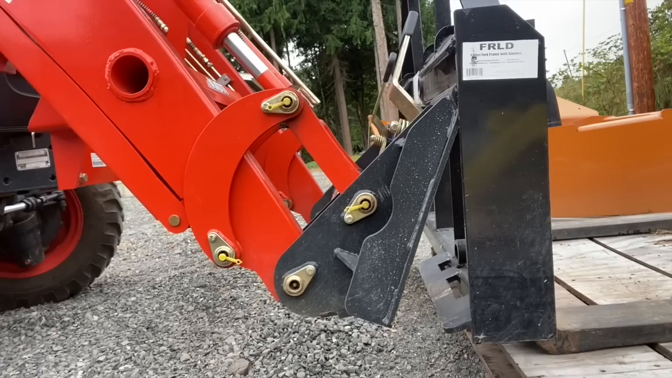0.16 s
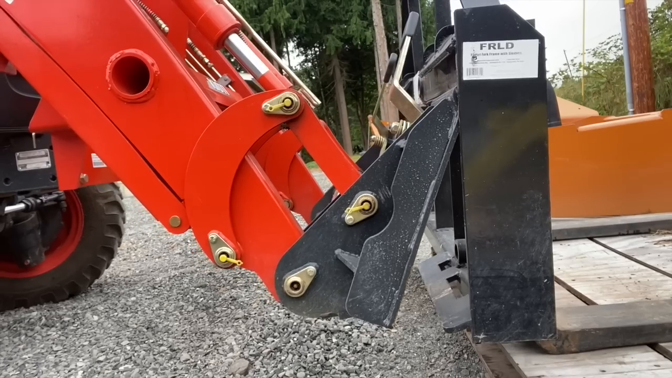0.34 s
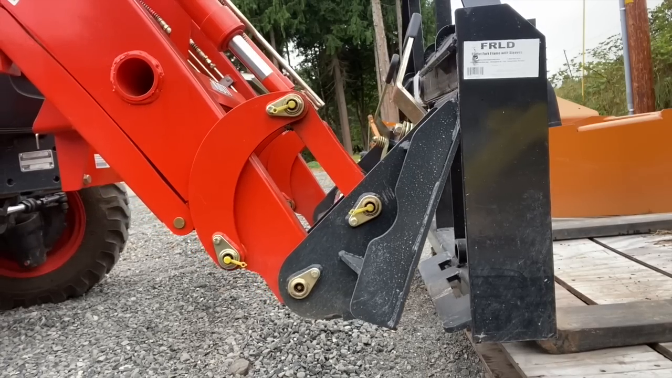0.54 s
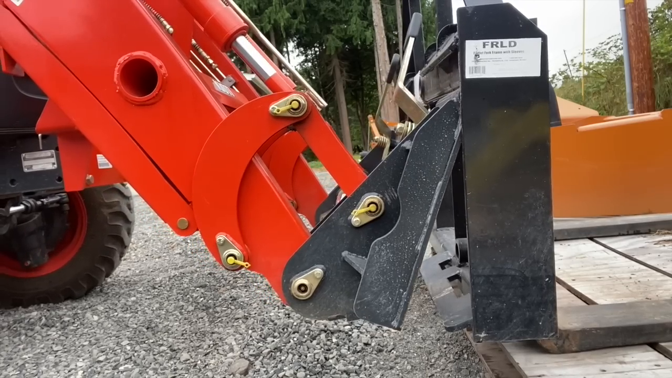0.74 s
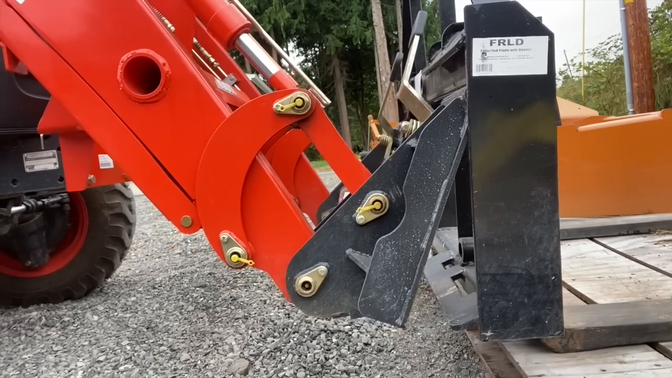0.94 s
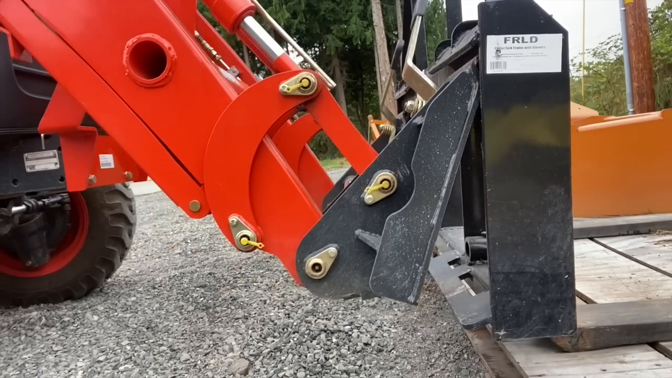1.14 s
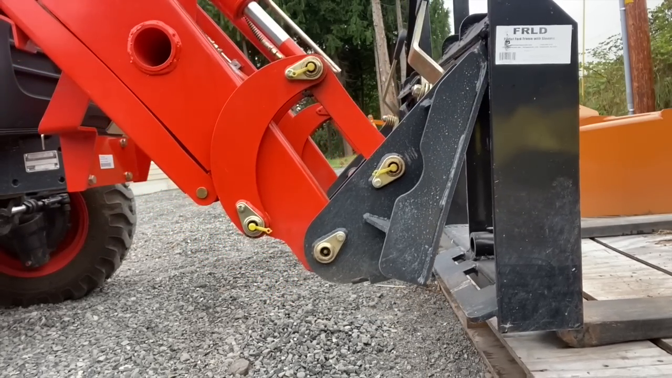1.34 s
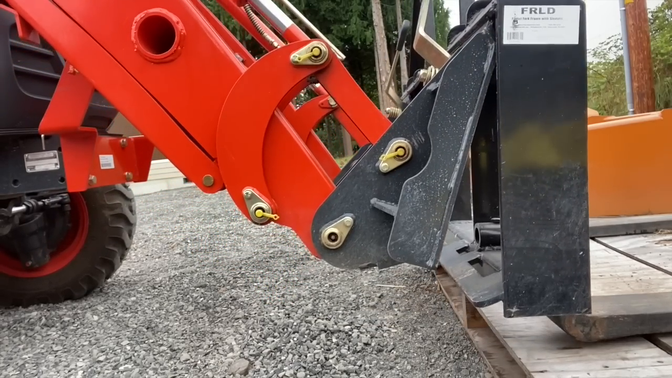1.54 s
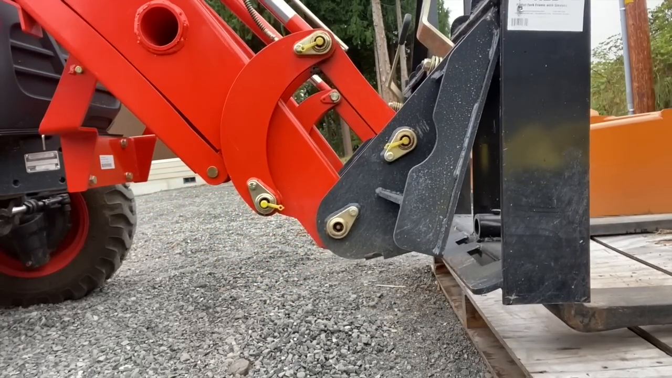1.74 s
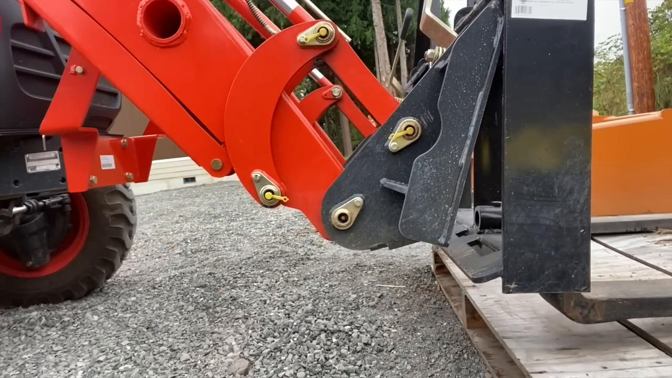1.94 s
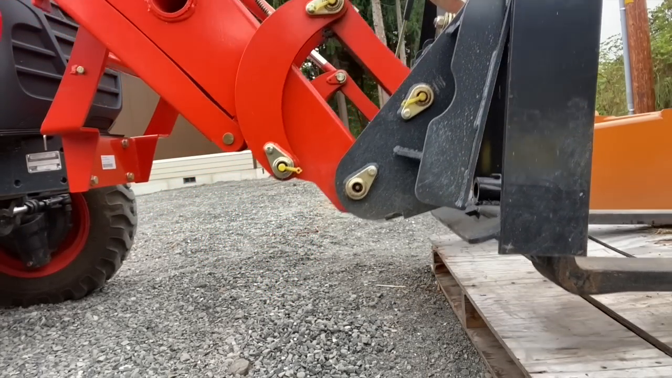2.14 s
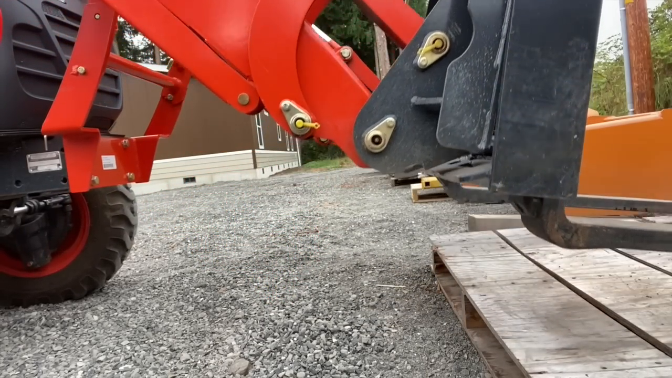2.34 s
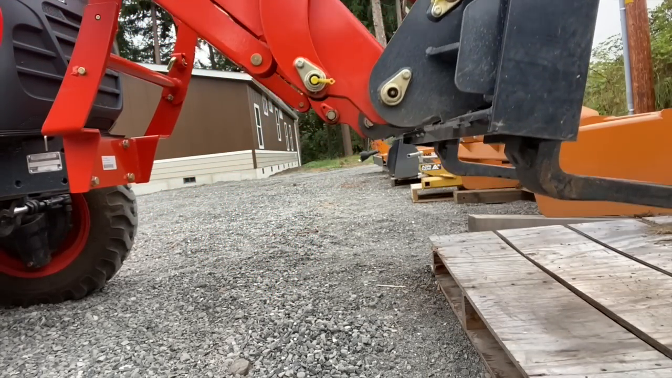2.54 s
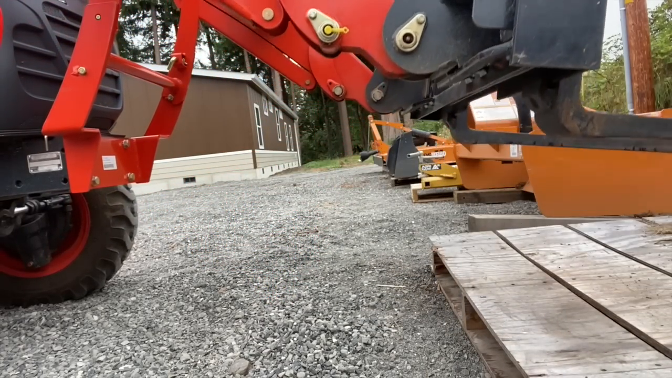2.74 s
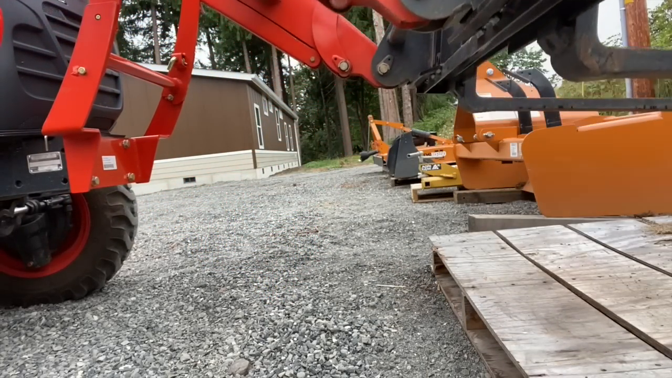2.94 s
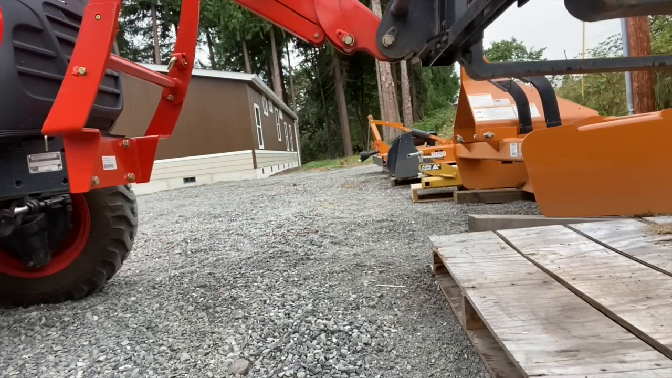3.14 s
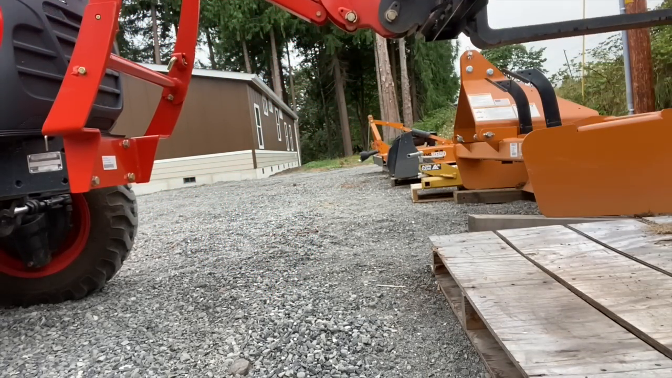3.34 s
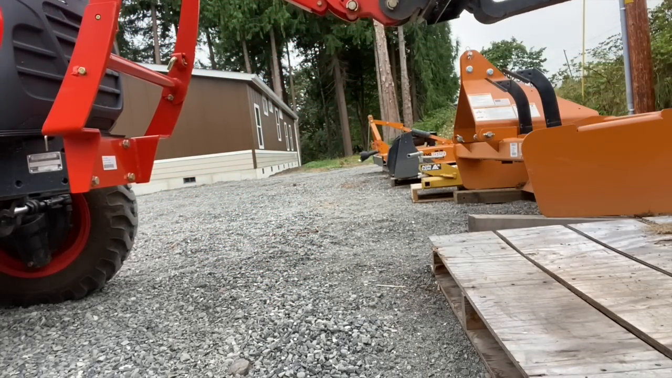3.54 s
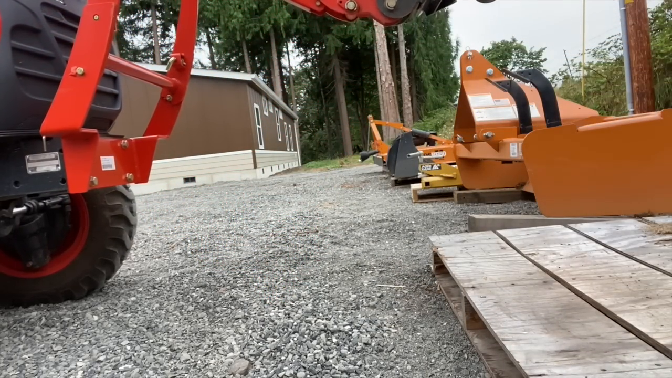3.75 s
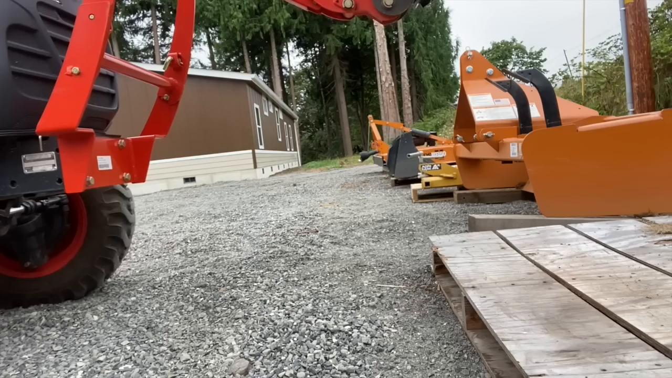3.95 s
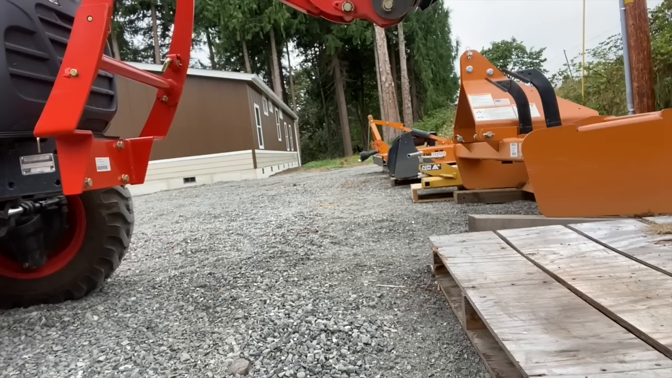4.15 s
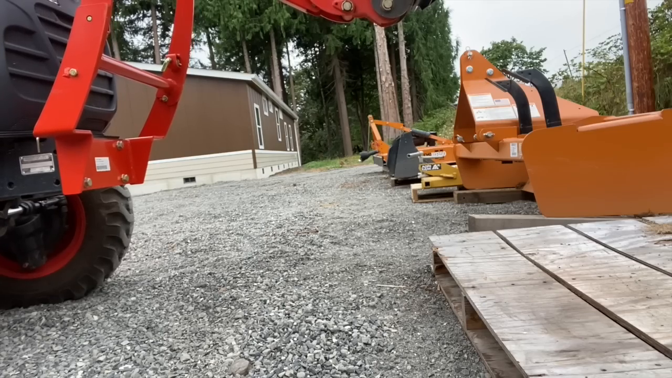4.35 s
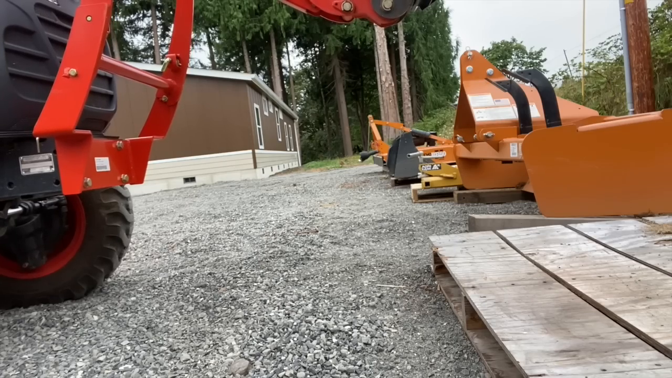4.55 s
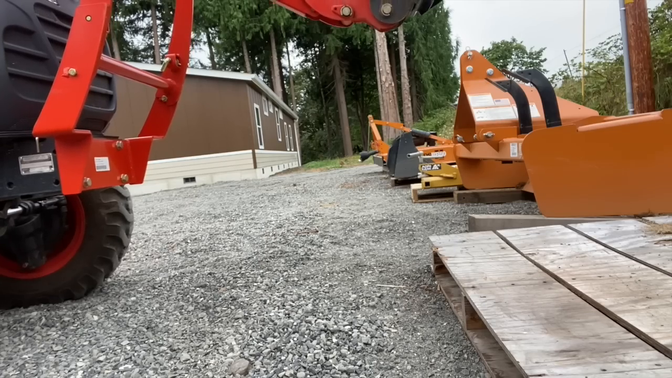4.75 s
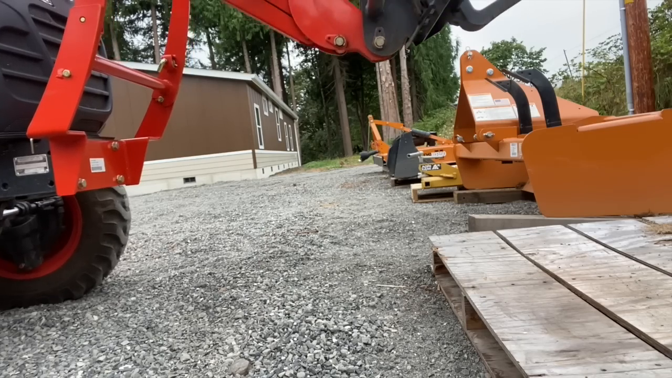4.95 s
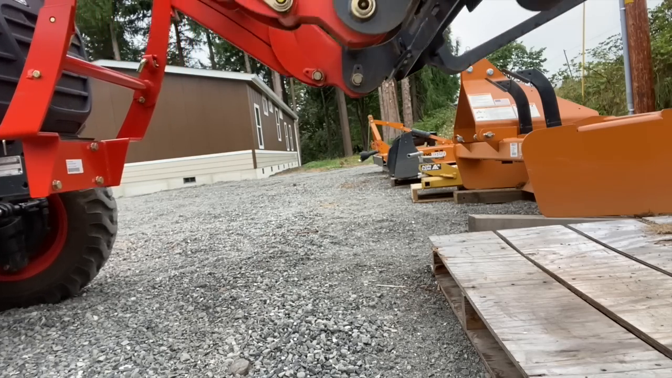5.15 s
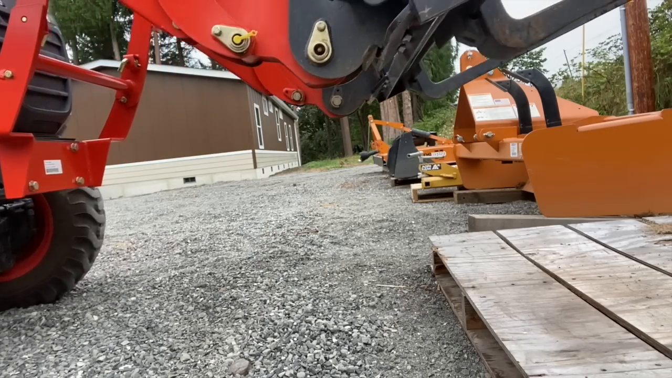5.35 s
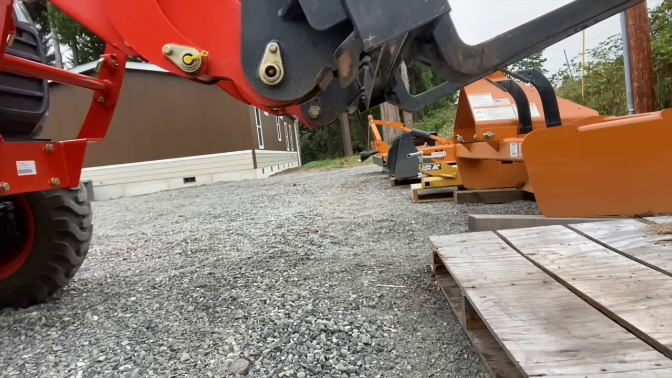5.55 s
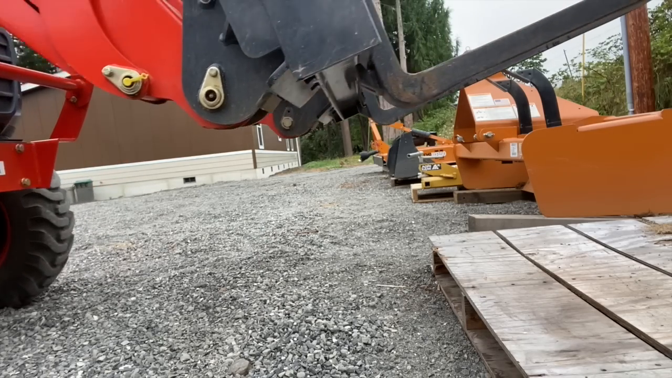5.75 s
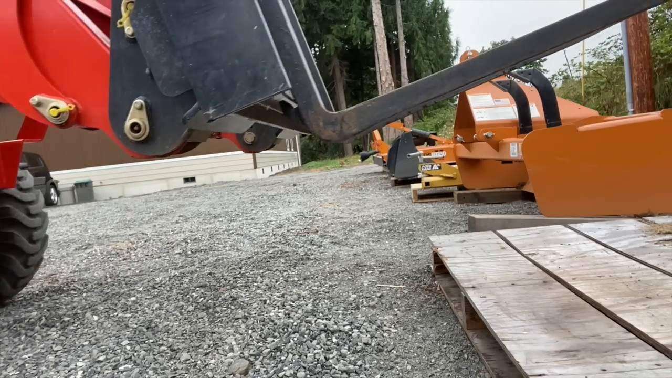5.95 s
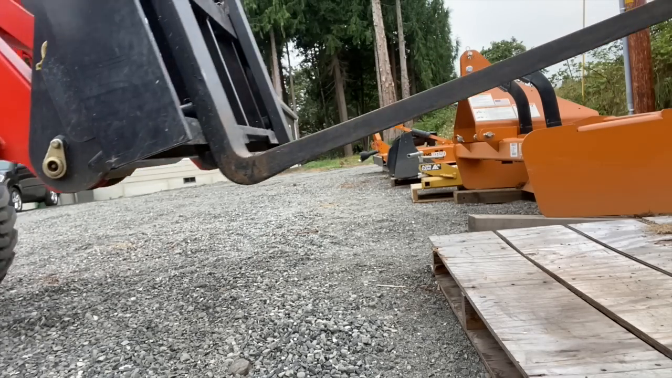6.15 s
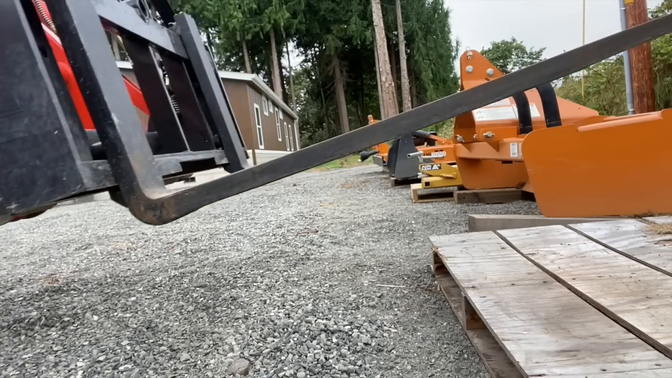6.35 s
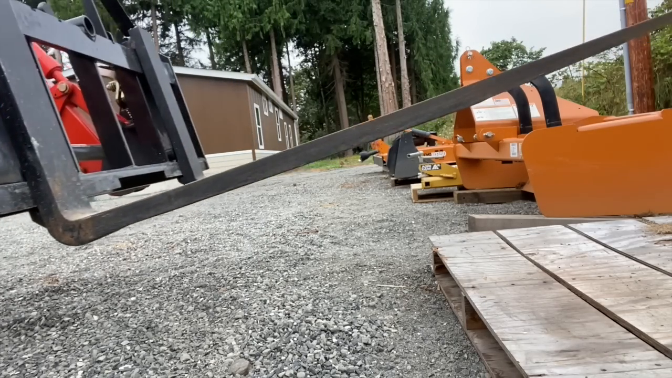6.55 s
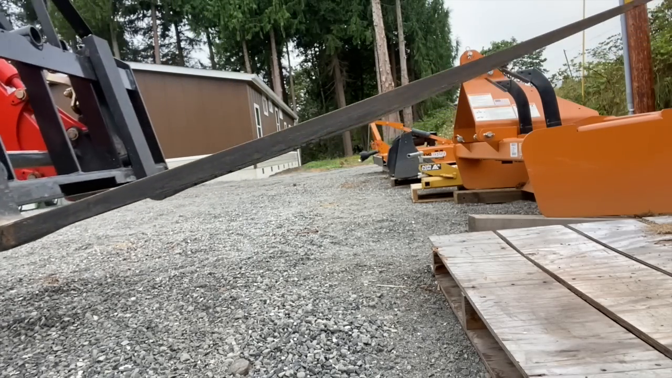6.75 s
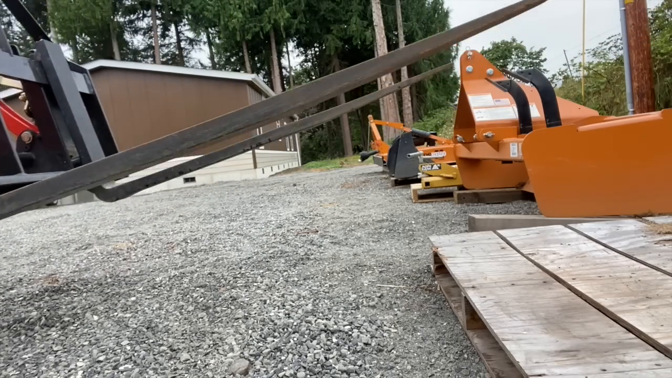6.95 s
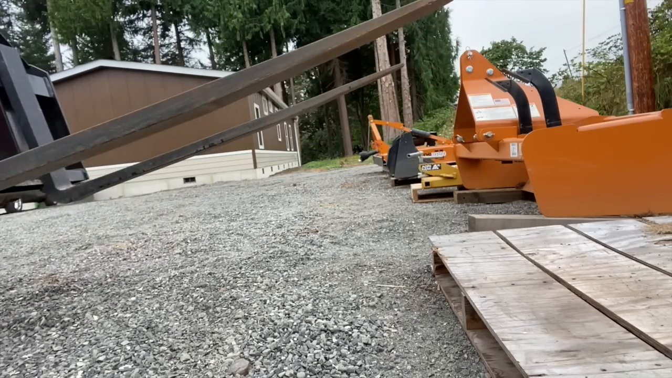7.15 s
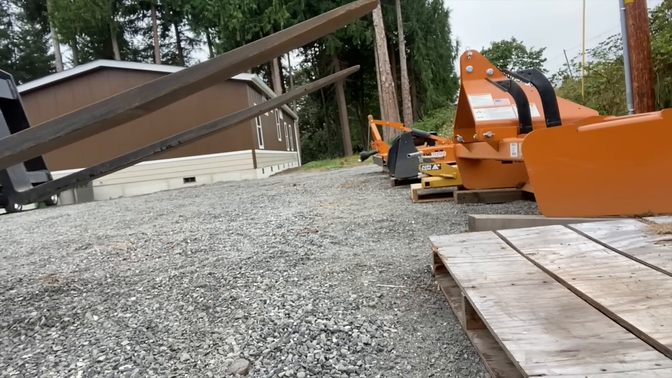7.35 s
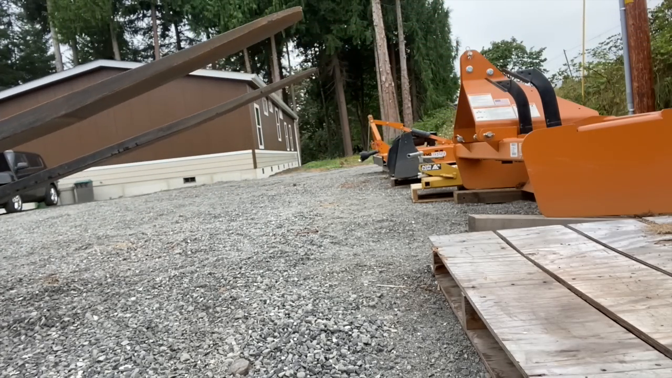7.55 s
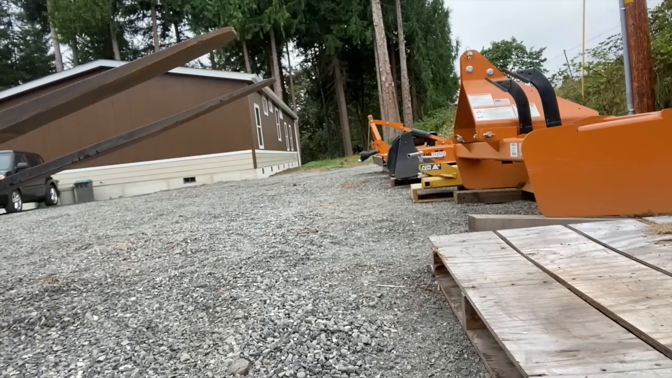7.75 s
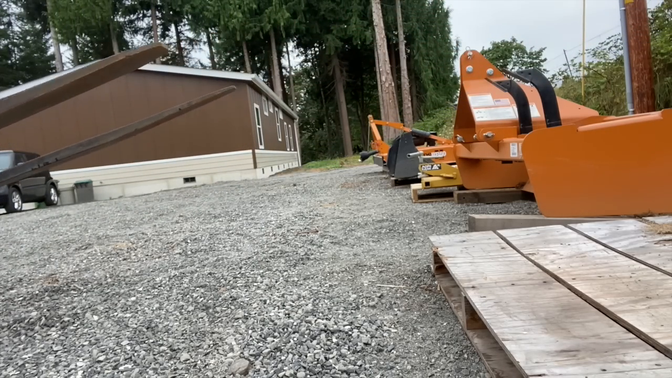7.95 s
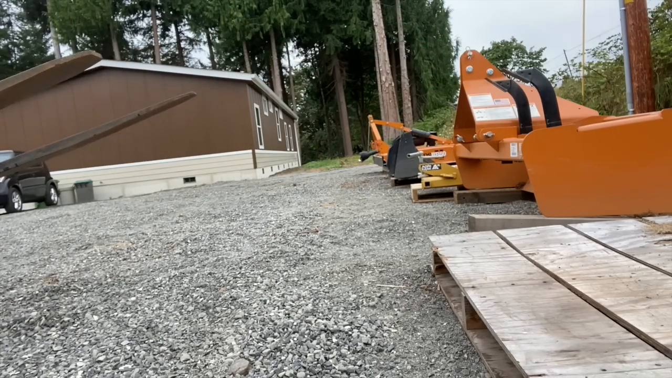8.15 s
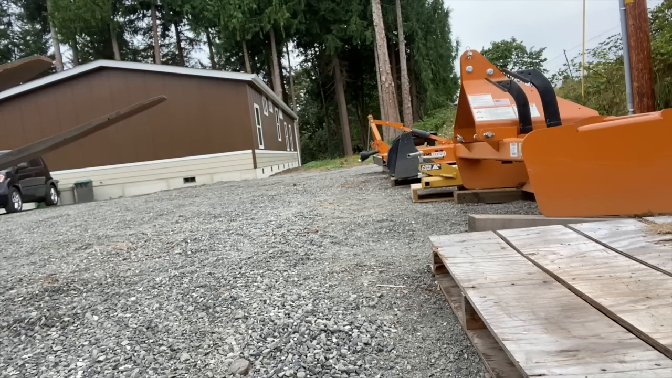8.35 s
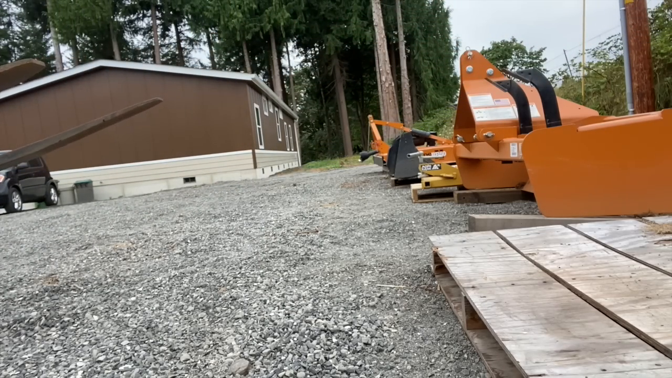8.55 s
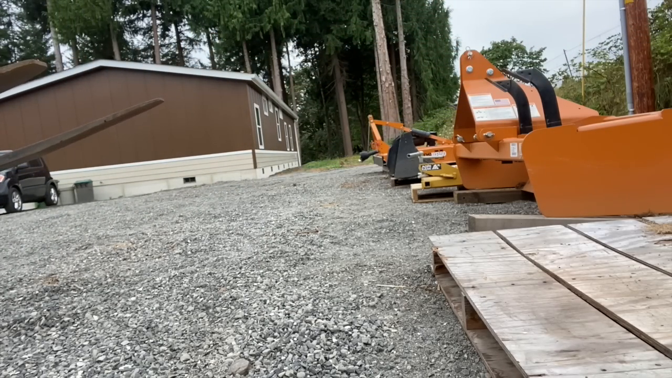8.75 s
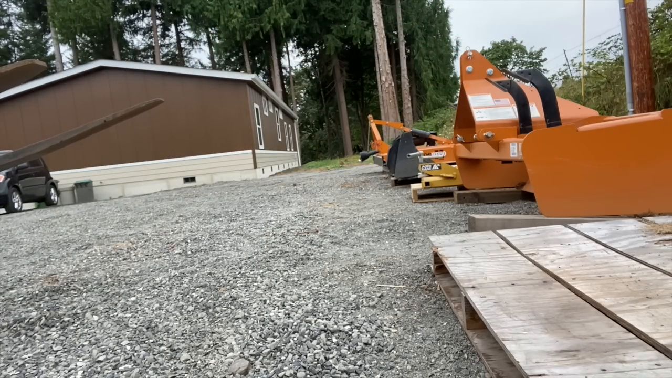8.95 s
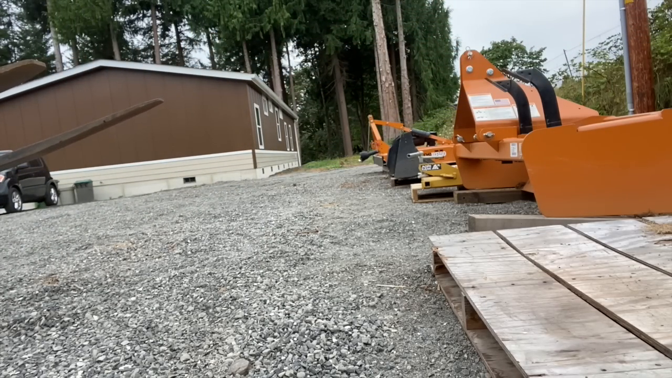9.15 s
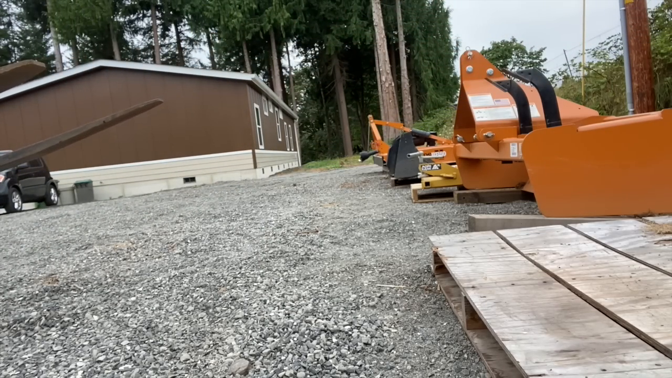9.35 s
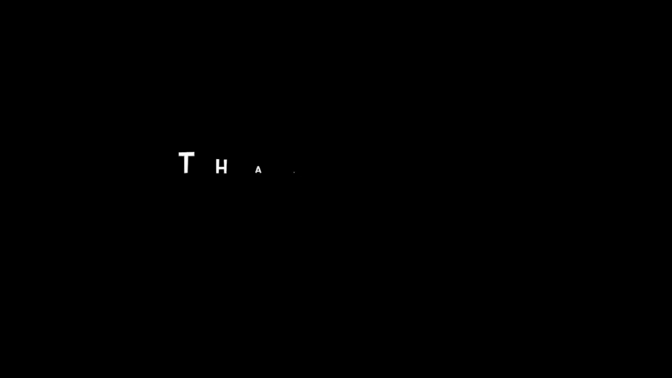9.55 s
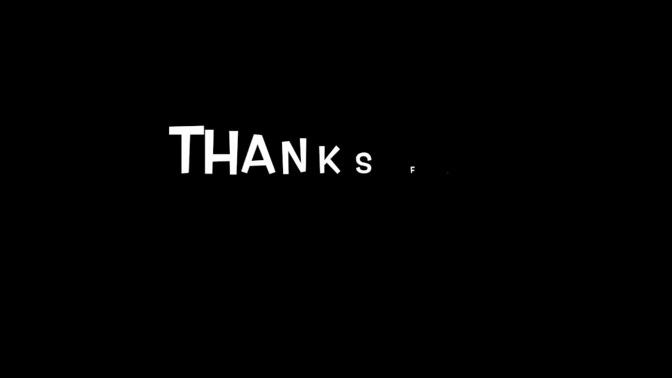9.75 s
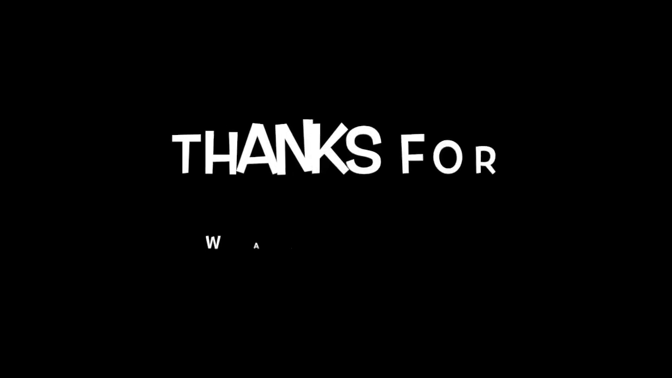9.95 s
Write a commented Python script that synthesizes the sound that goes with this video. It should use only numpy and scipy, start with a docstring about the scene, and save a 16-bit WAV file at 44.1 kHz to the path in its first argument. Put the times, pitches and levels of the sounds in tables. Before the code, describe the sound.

Close outdoor tractor diesel with steady knock and gear whine, a few steel fork clanks, a rev up while reversing, then a more distant idle.

```python
"""Diesel tractor with a loader

A three-cylinder diesel tractor idles fast on gravel, to the left of a stereo pair, while its loader lifts;
then it revs up, backs away and settles. The exhaust and whining gears are sums of tones locked to the firings,
knock is clicks ringing in the metal, fan and valve roar is pulsing noise, and the steel forks clank and rattle
as short dying rings and noise. The sound is cut off near the end."""
import sys
import numpy as np
from scipy import signal
from scipy.fft import rfft, irfft, next_fast_len
from scipy.io import wavfile
from scipy.ndimage import uniform_filter1d, map_coordinates

SR = 44100
rng = np.random.default_rng(int(sys.argv[2]) if len(sys.argv) > 2 else 0)


def gain_from_db(level_db):
    """Convert decibel levels to linear amplitude factors (20 dB per decade)."""
    decades = np.asarray(level_db, float) / 20
    return 10 ** decades


def file_out(sig):
    """Save sig as 16-bit WAV at sys.argv[1]."""
    # one column per channel
    cols = np.atleast_2d(sig).T
    # limit, then scale
    lim = np.clip(cols, -1, 1)
    pcm = np.round(lim * 32767).astype(np.int16)
    wavfile.write(sys.argv[1], SR, pcm)


N = 440997  # samples, about 10 s

# how far the tractor has backed away and to the side: start_s, distance (0 near to 1 far)
AWAY = [(0, 0.02), (5.6, 0.05), (6, 0.15), (6.6, 0.54), (7.2, 0.83), (8.5, 1), (10, 1)]


def unit(x):
    """Scale to rms 1."""
    return x / np.sqrt(np.mean(x ** 2) + 1e-20)


def along(points, hz):
    """Read a table of (Hz, value) points, spaced evenly in pitch."""
    point_hz, value = np.transpose(points)
    return np.interp(np.log(hz + 1), np.log(point_hz + 1), value)


def curves(rows):
    """One value per sample for each column after the time."""
    start_s, *columns = np.transpose(rows)
    return [np.interp(np.arange(N) / SR, start_s, column) for column in columns]


def wobble(rate, size=N):
    """A smooth random curve over the whole length, with rate random points a second."""
    knots = N * rate / SR
    return map_coordinates(rng.standard_normal(int(knots) + 4), [np.arange(size) * knots / size])


def filtered(x, response):
    """Multiply the spectrum of x by a response, real or complex, of frequency."""
    padded = next_fast_len(N + 8192)
    spectrum = rfft(x, padded) * response(np.fft.rfftfreq(padded, 1 / SR))
    return irfft(spectrum, padded)[..., :N]


def coloured(x, spectrum):
    """Shape x by (Hz, dB) points, then bring it to rms 1."""
    return unit(filtered(x, lambda hz: gain_from_db(along(spectrum, hz))))


def speed():
    """Engine speed in firings per second, before its small random hunting."""
    # engine speed over time: start_s, firings_hz
    speed_rows = [(0.0, 51.51), (3.94, 51.45), (4.08, 52.3), (4.3, 51.4), (5.5, 51.25), (5.57, 51.75),
                  (5.82, 59.13), (5.98, 62.2), (6.1, 64), (6.38, 65.34), (7.06, 65.75), (8.2, 65.95),
                  (8.33, 62.03), (8.41, 55.85), (8.5, 51.4), (8.6, 50), (8.91, 51.51), (9.5, 51.64)]
    return curves(speed_rows)[0]


def revved():
    """How far the engine has revved up: 0 at working idle, 1 at raised speed."""
    idle_hz, span_hz = 51.26, 15.1
    return np.clip((speed() - idle_hz) / span_hz, 0, 1)


def firings():
    """Add up the speed to count firings so far; the governor hunts a little about the set speed."""
    hunt_hz = 0.2
    return np.cumsum(speed() + hunt_hz * wobble(6)) / SR + .3


def level(idle_db, revved_db, push_db, reach_share):
    """Level of a layer in dB: gains revved_db at raised speed, push_db per Hz/s of speeding up."""
    # change in level as the tractor shifts and backs away: start_s, reach_db
    reach_rows = [(0, 0), (.5, -0.5), (2.4, 0.5), (3, -0.9), (5.4, -1.5), (5.9, -0.5), (6.4, -2.5),
                  (7.3, -5), (8.1, -5.5), (8.5, -8), (9.5, -7.5)]
    rise = np.gradient(speed()) * SR  # Hz per second
    push = np.clip(uniform_filter1d(rise, SR // 10), 0, None)  # speeding up only
    return idle_db + revved_db * revved() + push_db * push + reach_share * curves(reach_rows)[0]


def pump(turns):
    """Gear teeth of the hydraulic pump and timing train whine at fixed multiples of the firing rate."""
    # gear tooth tones: multiple of the firing rate
    gear_multiples = np.array([14, 16, 17])
    # level of the middle tone, strongest until the engine drops back to idle, higher while the pump works:
    # start_s, level_db
    whine_rows = [(0, -33.5), (2, -36), (3.5, -38), (6.5, -40), (7.1, -34), (7.5, -35.5), (8.2, -35),
                  (8.7, -45.5), (9.5, -48.5)]
    whine_db = curves(whine_rows)[0]
    levels_db = whine_db - 8, whine_db, -43  # the timing train stays steady
    tones = 0
    for k, tone_db in zip(gear_multiples, levels_db):
        loudness = gain_from_db(tone_db + 2.5 * wobble(5))
        tones = tones + loudness * np.cos(2 * np.pi * k * turns + .008 * k * wobble(12))
    load = 1 + 0.22 * np.cos(2 * np.pi * turns)  # each firing presses the teeth together
    return load * tones


def roar(turns):
    """Fan and valve gear: patchy noise pulses twice a firing and once a cycle, and changes colour with distance."""
    # roar close by: pitch_hz, relative level_db
    near_colour = [(500, -96), (700, -66.5), (850, -53), (1150, -61), (2200, -58), (3300, -60),
                   (4200, -64.5), (6200, -69.5), (7800, -68.5), (9000, -82.5), (11000, -74), (13000, -89.5),
                   (16000, -110)]
    # roar further off: pitch_hz, relative level_db
    far_colour = [(500, -80.5), (700, -61), (1150, -59), (1600, -62.5), (2200, -62), (2800, -66.5),
                  (3500, -60.5), (4200, -67), (6200, -68), (7500, -73.5), (9000, -77), (11000, -76.5),
                  (13000, -82.5), (16000, -90)]
    # low churning noise: pitch_hz, relative level_db
    churn_colour = [(30, -87), (85, -73.5), (150, -55.5), (260, -57.5), (400, -54), (480, -69.5),
                    (620, -62), (800, -84)]
    # a bright hiss swells as the tractor pulls away: start_s, level_db
    swell_rows = [(0, -70), (5.5, -62.5), (5.9, -38.5), (6.6, -38.5), (7.2, -43.5), (8.2, -50), (8.6, -65)]
    # colour of that hiss: pitch_hz, relative level_db
    swell_colour = [(4000, -40), (5300, 0), (6100, 9), (7000, -11), (9000, -19.5), (11500, -21),
                    (14000, -13.5), (16000, -30)]
    away = curves(AWAY)[0]

    # patches: neighbouring pitches and moments rise and fall together
    z = signal.stft(rng.standard_normal((3, N)), nperseg=512)[2]
    field = uniform_filter1d(rng.standard_normal(z.shape), 6, 1)
    field = uniform_filter1d(field, 10, 2)
    noise = signal.istft(z * gain_from_db(1.08 * unit(field)), nperseg=512)[1][:, :N]

    twice_a_firing = 1.1 * np.cos(4 * np.pi * turns - .6)
    once_a_cycle = .8 * np.cos(2 * np.pi * turns / 3)
    pulse = gain_from_db(twice_a_firing + once_a_cycle) * gain_from_db(0.35 * wobble(150))

    near = np.sqrt(1 - away) * coloured(pulse * noise[0], near_colour)
    far = np.sqrt(away) * coloured(pulse * noise[1], far_colour)
    roar_db = level(idle_db=-27.5, revved_db=4, push_db=0.0479, reach_share=0.56)
    churn_db = level(idle_db=-32, revved_db=3.5, push_db=0.05, reach_share=0.5)
    body = gain_from_db(roar_db + 0.57 * wobble(4.5)) * (near + far)
    churn = gain_from_db(churn_db + 1.8 * wobble(2.9)) * coloured(noise[2], churn_colour)
    swell = gain_from_db(curves(swell_rows)[0]) * coloured(pulse * rng.standard_normal(N), swell_colour)
    return body + churn + swell


def forks():
    """Loose forks clank in their frame, each contact at its own pitch; thin parts rattle brightly."""
    # fork clanks: start_s, level_db, pitch_hz of the main ring, extra_db of the upper rings
    clanks = [(1.046, -16, 1380, 0), (1.3226, -11, 1500, 7.5), (1.328, -12, 1407, -2),
              (1.34, -11.5, 1394, 7.5), (2.5157, -6, 1596, -4), (2.5244, -10, 1660, -5),
              (2.5388, -9.5, 1550, -1.5), (2.552, -10.5, 1353, -3), (2.5614, -8.5, 1382, -4),
              (2.566, -15, 1046, -6), (2.5785, -14.5, 1720, -1)]
    # rings of the fork steel: ratio to the main ring, relative level_db, time to fall 60 dB in s
    fork_rings = [(.72, -8.5, 0.033), (1, -0.5, 0.067), (1.12, -11.5, 0.078), (1.32, -9, 0.051),
                  (1.6, -6.5, 0.028), (1.85, -11, .03), (2.25, -8, .035)]
    # bright rattles as the boom stops: start_s, level_db, time to fall 60 dB in s
    rattles = [(2.506, -20, 0.081), (2.565, -20, .05), (3.944, -15.5, .06), (4.003, -17.5, .12),
               (4.02, -29, .07), (4.055, -25.5, .06)]
    # colour of the rattles: pitch_hz, relative level_db
    rattle_colour = [(1500, -27), (3000, 7.5), (5500, 5.5), (8000, -6.5), (15000, -8)]
    steel, rattle = np.zeros(N + SR), np.zeros(N + SR)
    t = np.arange(SR // 4) / SR

    for start_s, clank_db, pitch_hz, upper_db in clanks:
        ring = 0
        for ratio, ring_db, fall_s in fork_rings:
            start_db = ring_db + upper_db * (ratio > 1.2) + rng.normal(0, 2)
            ring = ring + gain_from_db(start_db - 60 * t / fall_s) * np.sin(2 * np.pi * pitch_hz * ratio * t)
        ring = ring * (1 - np.exp(-t / .0004))  # soft start
        band = signal.butter(1, [300, 2500], 'band', fs=SR)
        crack = signal.lfilter(*band, rng.standard_normal(len(t)))  # the crack of contact
        place = steel[round(start_s * SR):][:len(t)]
        place += gain_from_db(clank_db - 2.0) * ring
        place += gain_from_db(clank_db - 4.5 - 60 * t / 0.012) * crack

    for start_s, rattle_db, fall_s in rattles:
        burst = gain_from_db(rattle_db - 60 * t / fall_s) * (1 - np.exp(-t / .001))
        rattle[round(start_s * SR):][:len(t)] += burst
    return steel[:N] + rattle[:N] * coloured(rng.standard_normal(N), rattle_colour)


def rung(force, body):
    """Let the blows ring a set of resonances, each with its own level for each cylinder."""
    def response(hz):
        total = 0
        for centre, width, *cylinder_db in body:
            resonance = 1j * hz * width / (centre * centre - hz * hz + 1j * hz * width)
            total = total + gain_from_db(cylinder_db)[:, None] * resonance
        return total
    return unit(filtered(force, response))


def knock(turns, count=14):
    """Each firing is a blow, then valve and injector taps at set crank angles; one row per cylinder."""
    # rings of block and panels: pitch_hz, width_hz, relative level_db for cylinders 1, 2 and 3
    block = [(776, 24, -0.5, 2, -9), (950, 120, -7, -3.5, -11.5), (1290, 60, -5.5, -3.5, -7.5),
             (1500, 57, -20.5, -8, -8.5), (1943, 250, -10, -3, -8.5), (2408, 130, -0.5, -9, -6),
             (3110, 420, -8, -1.5, -8), (3406, 570, -4, -17.5, -3), (4260, 340, -28.5, -29, -19),
             (5330, 470, -8.5, -14.5, -17), (7800, 540, -21, -16, -40), (11000, 2500, -38.5, -34.5, -37)]
    # a panel that rings more as the boom uncovers it: same columns as the block
    hood = [(1626, 43, 2, 0.79, 1), (1675, 45, -1.5, -1.5, -4.5)]
    # level of the hood ring: start_s, level_db
    hood_rows = [(0, -41.5), (1, -41.5), (1.9, -39), (2.3, -35), (2.8, -36.5), (3.9, -34.5), (4.9, -35),
                 (5.3, -37), (5.85, -39.5), (6, -34.5), (6.7, -38), (7.3, -48), (9.3, -44.5)]
    # a small part that buzzes at raised speed: same columns as the block
    bracket = [(3900, 45, .5, -1.5, -.5)]
    # level of the bracket buzz: start_s, level_db
    buzz_rows = [(0, -57), (5.5, -59.5), (6.1, -48.5), (6.45, -37.5), (7.1, -36), (7.5, -51.5), (8.2, -62)]

    total = int(turns[-1])
    cylinder = np.arange(total) % 3
    angle = np.sort(rng.random((3, count))) * (np.arange(count) > 0)  # part of a firing; the blow is at 0
    size_db = -17 * angle + 1.9 * rng.standard_normal((3, count))
    size = rng.choice([-1, 1], (3, count)) * gain_from_db(size_db)
    play, strength = rng.standard_normal((2, total, count))
    when = np.arange(total)[:, None] + angle[cylinder] + .0015 * play  # a little play in the parts
    hit = size[cylinder] * gain_from_db(1.8 * strength) * (when > turns[0])

    # place the hits in three rows laid end to end, one per cylinder
    at = np.interp(when, turns, np.arange(N)).round().astype(int) + N * cylinder[:, None]
    force = np.bincount(at.ravel(), hit.ravel(), 3 * N).reshape(3, N)
    force = signal.lfilter([1], [1, -.5], force)  # taps last a moment, so the highest treble is weak

    knock_db = level(idle_db=-31.5, revved_db=-1, push_db=0.0534, reach_share=1.57)
    block_ring = gain_from_db(knock_db + 1.2 * wobble(3)) * rung(force, block)
    hood_ring = gain_from_db(curves(hood_rows)[0] + 0.77 * wobble(2.85)) * rung(force, hood)
    buzz = gain_from_db(curves(buzz_rows)[0]) * rung(force, bracket)
    return block_ring + hood_ring + buzz


def exhaust(turns, count=12):
    """Pulses as tones at thirds of the firing rate: low even multiples line up as two dips a firing, odd lag."""
    # whole multiples: multiple of the firing rate, relative level_db at working idle, revved, idling far off
    orders = [(1, -20.5, -8, -18.5), (2, -7, 1, -6.5), (3, -2, 2, -1.5), (4, 0.5, -12, 0.5),
              (5, -9, -12, -3), (6, -9.5, 0, -11.5), (7, -10.5, -21, -11.5), (8, -19.5, -29, -19.5),
              (9, -18.5, -16, -23), (10, -40.5, -32, -19.5), (11, -28, -28, -16.5), (12, -31.5, -38, -26.5)]
    # outline of the thirds between, which unequal cylinders add: same columns
    thirds = [(.33, -50.5, -48, -47.5), (1.5, -38, -40, -35), (2.5, -24.5, -23, -22),
              (4.5, -25.5, -19, -24.5), (6.5, -21.5, -20, -18.5), (7.5, -26.5, -22.5, -13),
              (9.5, -31.5, -26, -27), (11.7, -31.5, -39.5, -28.5)]
    # worked out at one sample in every count, as all the tones are low
    turns, away, rev = turns[::count], curves(AWAY)[0][::count], revved()[::count]
    chance = rng.uniform(0, 2 * np.pi, size=64)
    outline_k, *outline = np.transpose(thirds)
    tones = 0
    for third in range(1, 3 * len(orders) + 1):
        k = third / 3  # multiple of the firing rate
        if third % 3:
            idle_db, revved_db, distant_db = [np.interp(k, outline_k, column) for column in outline]
        else:
            idle_db, revved_db, distant_db = orders[third // 3 - 1][1:]
        upper_db = 5 * (third % 3 == 2)  # at idle the upper third of each pair is stronger
        resting_db = (1 - away) * idle_db + away * distant_db + upper_db
        tone_db = (1 - rev) * resting_db + rev * revved_db
        if third % 3 or k > 7.5:
            phase = chance[third]
        else:
            phase = np.pi + third % 2 * (2.4 - 0.61 * rev) * (1 - np.exp((1 - k) / 2))
        drift = 0.0031 * k * wobble(11, size=len(turns))
        loudness = gain_from_db(tone_db + .8 * wobble(3, size=len(turns)))
        tones = tones + loudness * np.cos(2 * np.pi * k * turns + phase + drift)
    exhaust_db = level(idle_db=-20.5, revved_db=1.45, push_db=0.03, reach_share=1.15)
    return gain_from_db(exhaust_db) * signal.resample_poly(tones, count, 1)[:N]


def ports(tones, parts, noise):
    """Two stereo ports: a shared wave that leads on one side, plus differing scatter off gravel and steel."""
    # lead of the left port: pitch_hz, near_radians, far_radians
    lead_rows = [(0, .29, .44), (150, .3, .47), (320, .45, .85), (500, .8, 1.3), (800, 1.4, 2.0),
                 (1500, 1.35, 2.5), (2700, 1.6, 3.15), (3400, 2.3, 3.7), (4300, 3.0, 4.6), (5400, 4.4, 6.1),
                 (6700, 5.7, 7.5), (8500, 6.8, 9.3), (10600, 10, 12.4), (13200, 12.2, 17),
                 (16000, 12.8, 19.5)]
    # balance: pitch_hz, left minus right level_db
    tilt_rows = [(60, -5), (110, -2.5), (200, -1), (380, -1.5), (700, 0), (1290, 4.5), (2380, 3), (4400, 0),
                 (8120, -1), (15000, -3)]
    # how much of the sound both ports share: pitch_hz, share (0 to 1)
    direct_rows = [(60, 0.94), (250, 0.9), (500, 0.83), (800, 1), (1100, 0.54), (1600, 0.9), (2200, 0.92),
                   (4000, 0.56), (6500, 0.36), (10000, 0.13), (14000, 0.24)]
    extra_lag = 2.5  # samples gained as the tractor moves to the side
    side, away = np.array([[1], [-1]]), curves(AWAY)[0]

    def share(hz):
        return np.clip(along(direct_rows, hz), 0, 1)

    def tilt(hz):
        return gain_from_db(side * along(tilt_rows, hz) / 2)

    lead_hz, near, far = np.transpose(lead_rows)
    far = far - 2 * np.pi * lead_hz * extra_lag / SR  # the plain delay follows below
    common = tones + filtered(parts.sum(0) + noise, lambda hz: np.sqrt(share(hz)))

    def leading(lead):
        return filtered(common, lambda hz: np.exp(.5j * side * np.interp(hz, lead_hz, lead)) * tilt(hz))

    direct = (1 - away) * leading(near) + away * leading(far)
    lag = extra_lag * away / 2
    direct = np.array([map_coordinates(port, [np.arange(N) + sign * lag], order=5)
                       for port, sign in zip(direct, (1, -1))])

    # scattered roar: the same noise with random phases at each port
    z = signal.stft(noise, nperseg=512)[2]
    phases = np.exp(2j * np.pi * rng.random((2, *z.shape)))
    jumbled = 1.56 * signal.istft(z * phases, nperseg=512)[1][:, :N]

    # scattered knock: each part keeps its own paths, random echoes that fall 60 dB in 0.03 s
    dying = gain_from_db(-60 * np.arange(1300) / SR / .03)
    echoes = unit(rng.standard_normal((2, len(parts), 1300)) * dying) / np.sqrt(1300)
    echoed = signal.fftconvolve(parts[None], echoes, axes=2)[..., :N].sum(1)

    scatter = filtered(jumbled + echoed, lambda hz: np.sqrt(1 - share(hz)) * tilt(hz))
    return (1 + 0.18 * away) * direct + (1 - 0.65 * away) * scatter  # a far source is a smaller point


def scene():
    """Engine, pump and forks at the two ports."""
    turns = firings()
    tones = exhaust(turns) + pump(turns) + forks()
    return ports(tones, knock(turns), roar(turns))


def band_limit(x):
    """A steep low-pass at the top of the band."""
    return signal.sosfilt(signal.butter(12, 16080, fs=SR, output="sos"), x)


def record(dry):
    """Remove the highest treble and fade the sound out within a few milliseconds near the end."""
    top_hz, cut_s, fade_s = 15700, 9.497, 0.0073
    fade = np.clip((cut_s - np.arange(N) / SR) / fade_s, 0, 1)
    mix = filtered(dry, lambda hz: hz < top_hz) * fade
    return band_limit(mix)


dry = scene()
out = record(dry)
file_out(out)
```